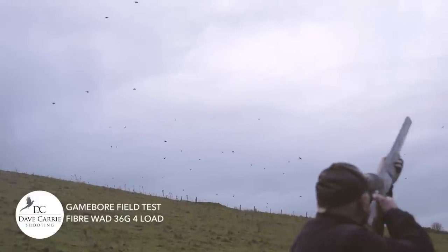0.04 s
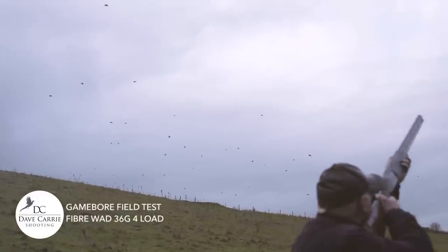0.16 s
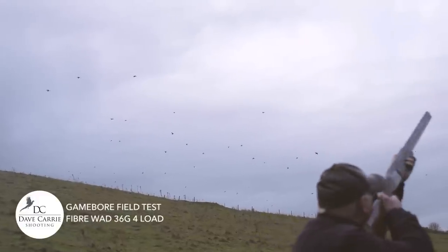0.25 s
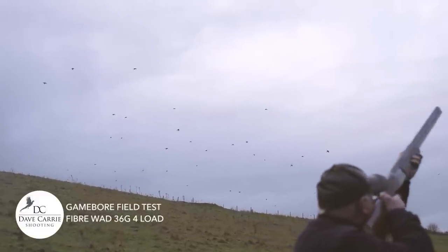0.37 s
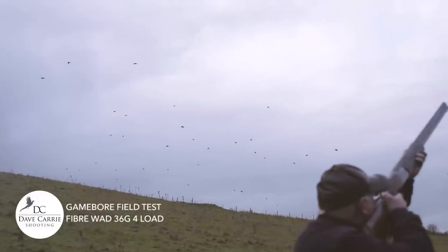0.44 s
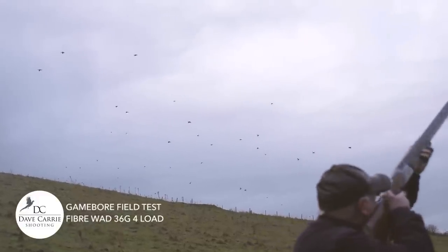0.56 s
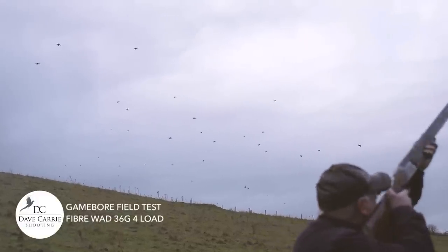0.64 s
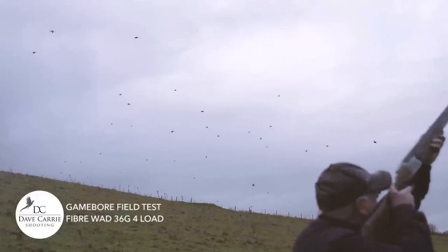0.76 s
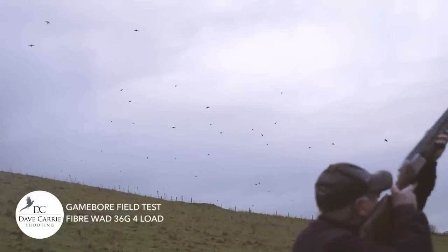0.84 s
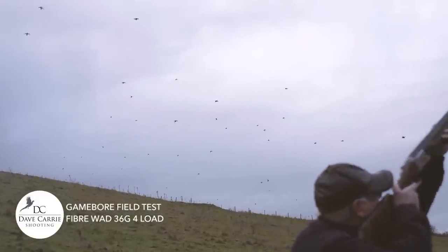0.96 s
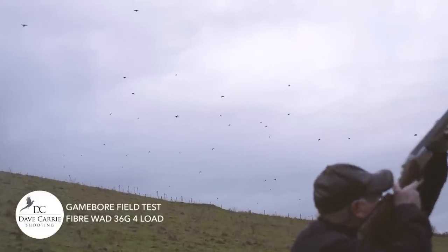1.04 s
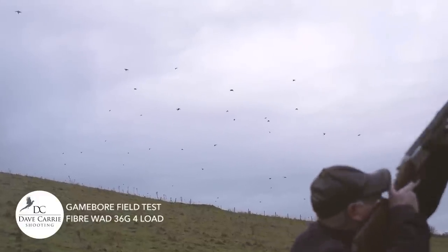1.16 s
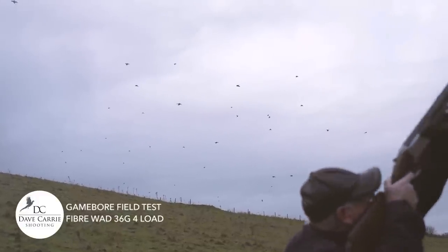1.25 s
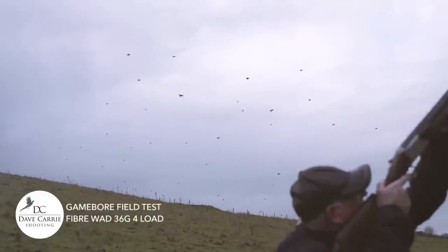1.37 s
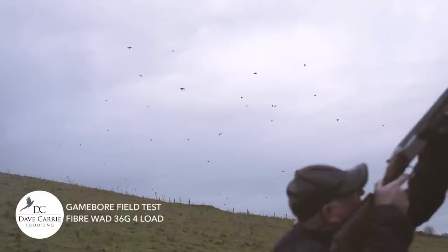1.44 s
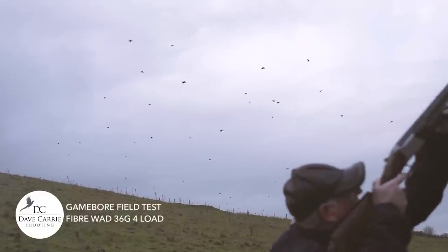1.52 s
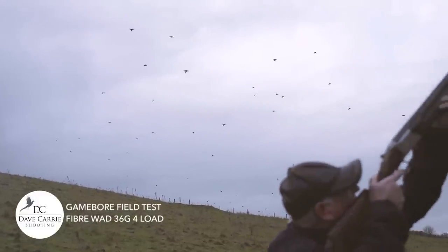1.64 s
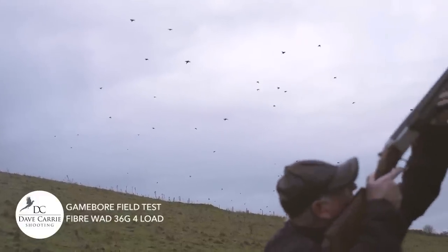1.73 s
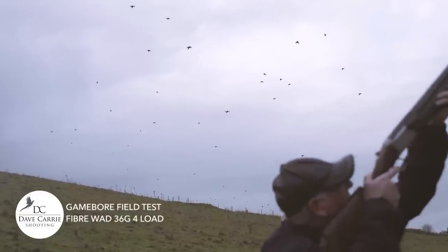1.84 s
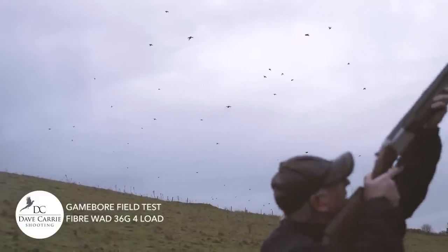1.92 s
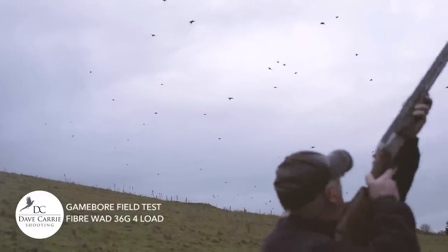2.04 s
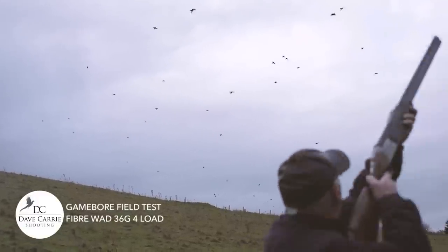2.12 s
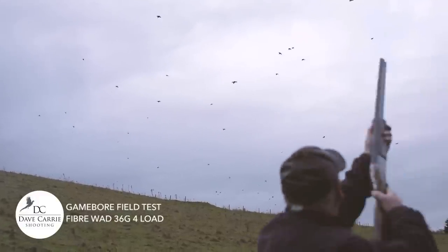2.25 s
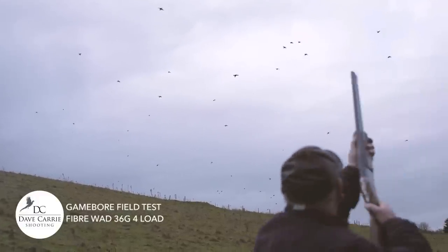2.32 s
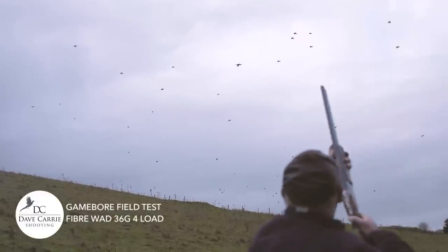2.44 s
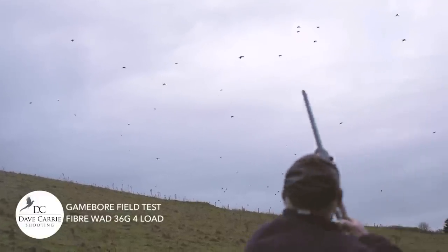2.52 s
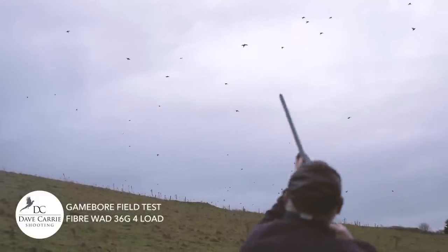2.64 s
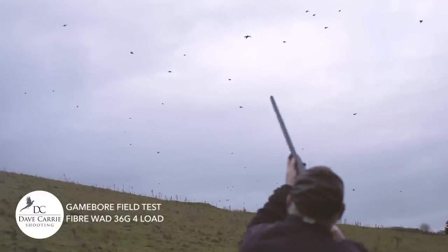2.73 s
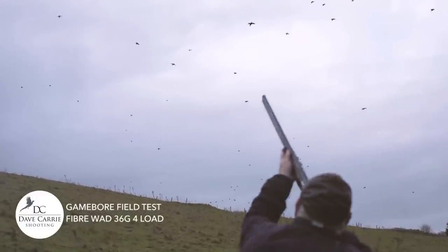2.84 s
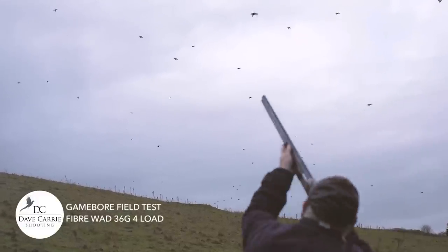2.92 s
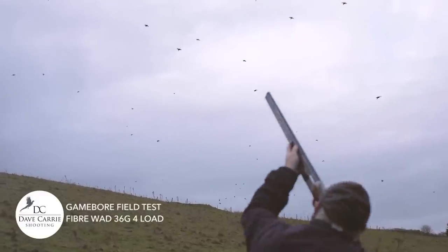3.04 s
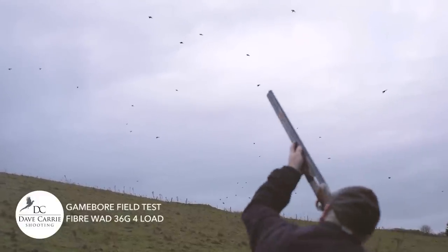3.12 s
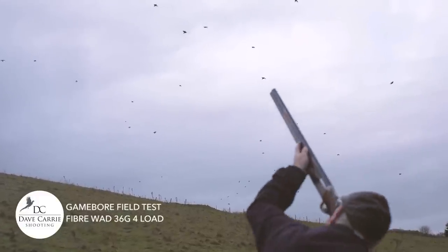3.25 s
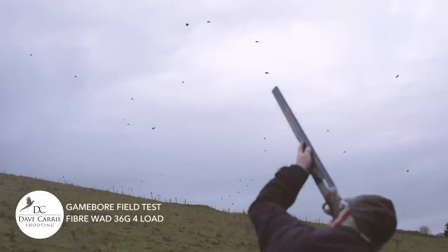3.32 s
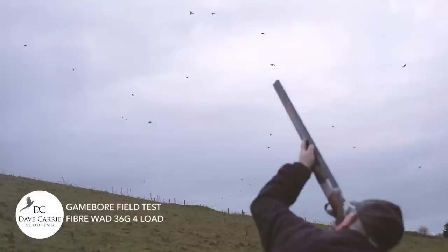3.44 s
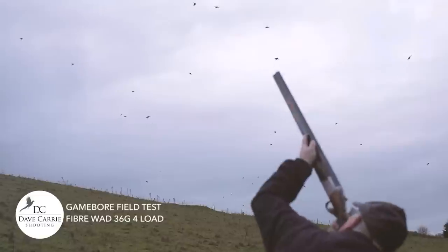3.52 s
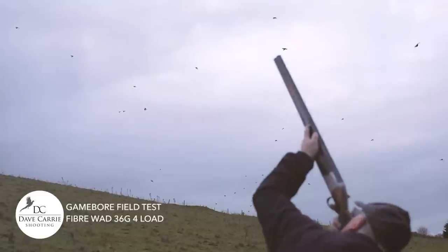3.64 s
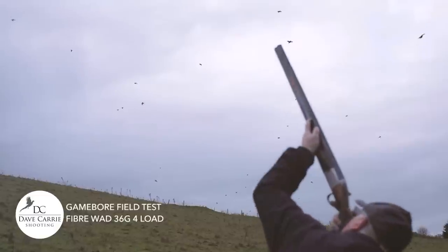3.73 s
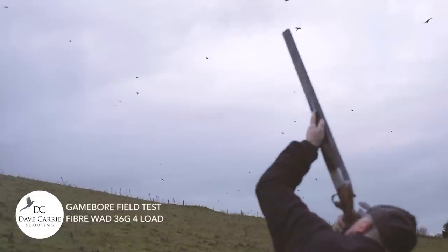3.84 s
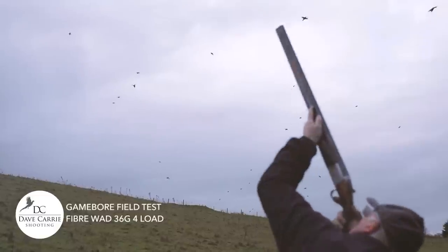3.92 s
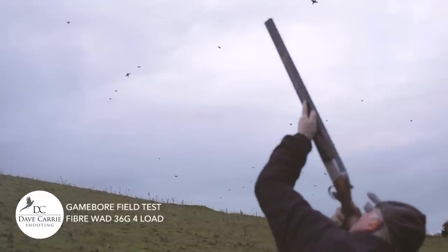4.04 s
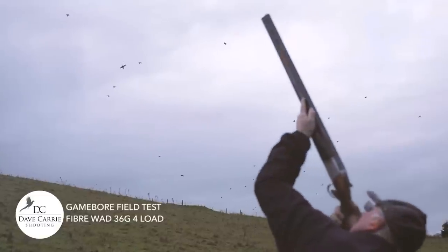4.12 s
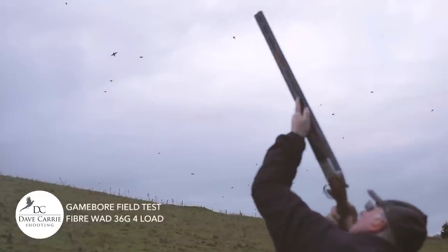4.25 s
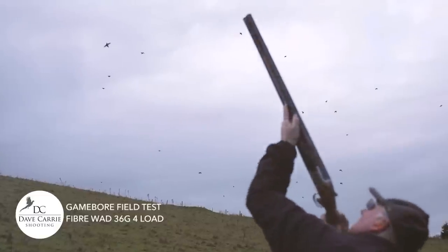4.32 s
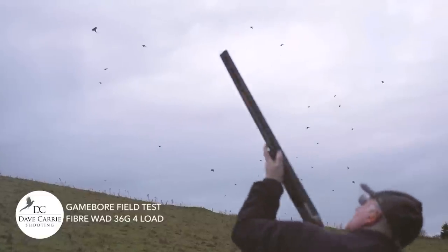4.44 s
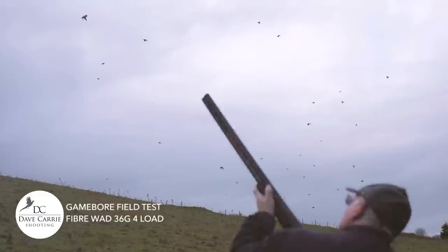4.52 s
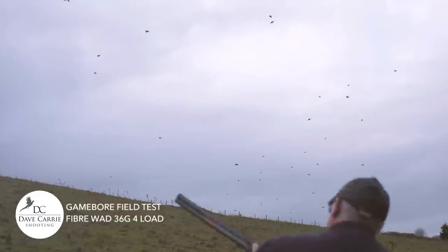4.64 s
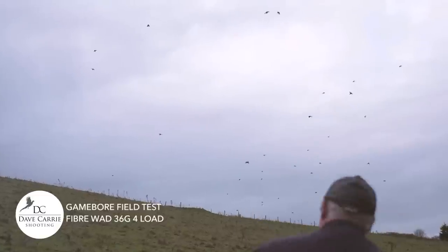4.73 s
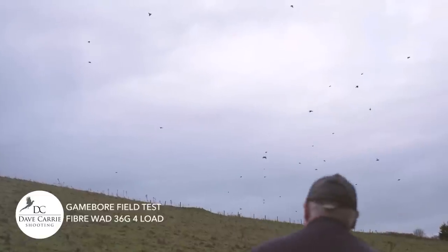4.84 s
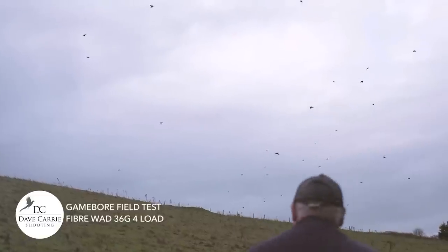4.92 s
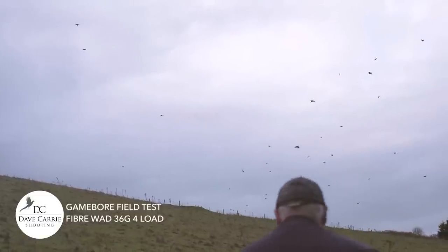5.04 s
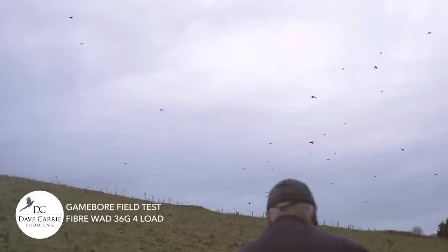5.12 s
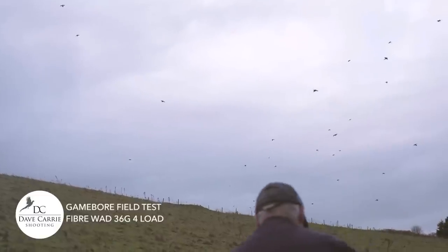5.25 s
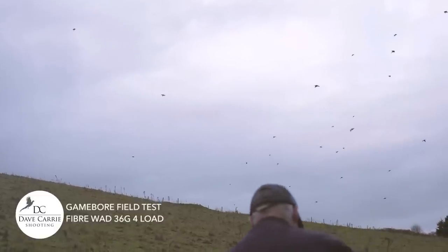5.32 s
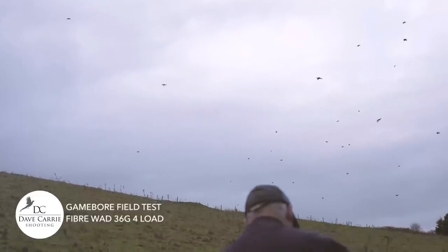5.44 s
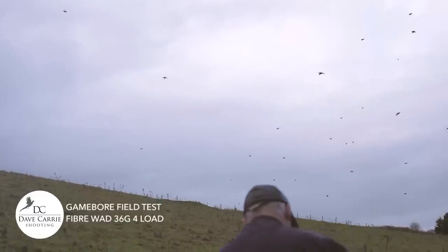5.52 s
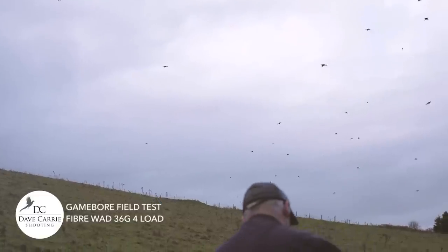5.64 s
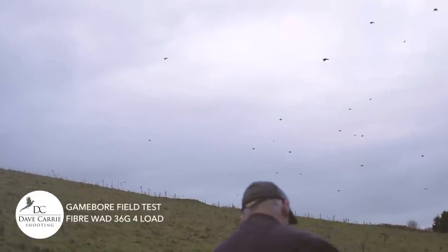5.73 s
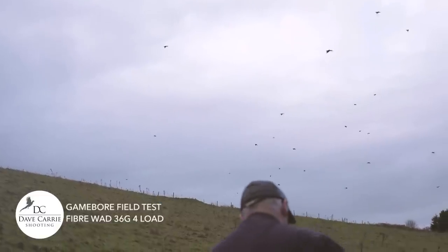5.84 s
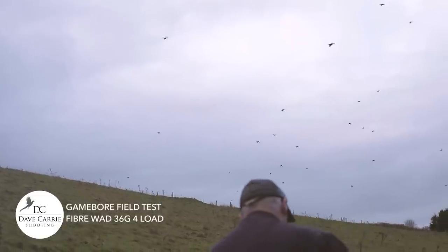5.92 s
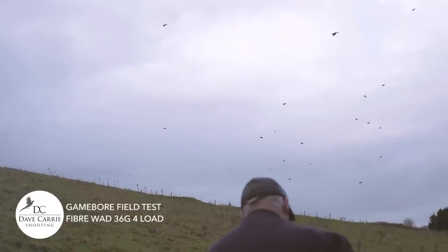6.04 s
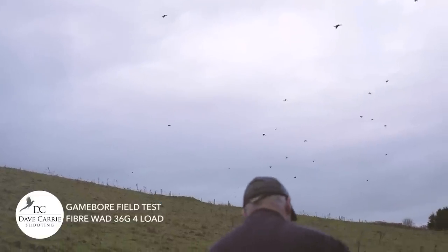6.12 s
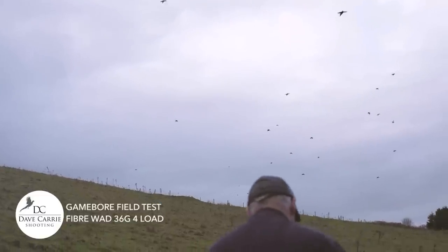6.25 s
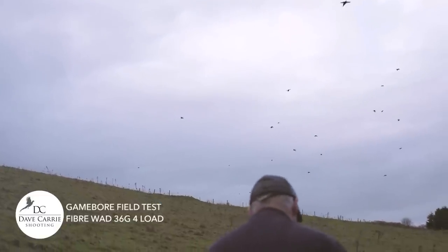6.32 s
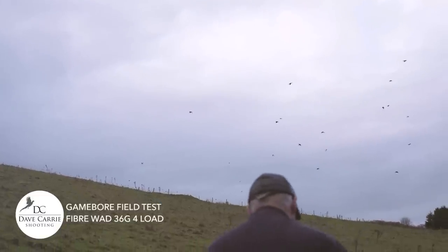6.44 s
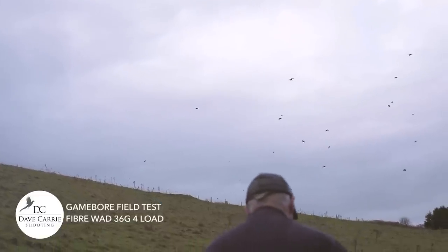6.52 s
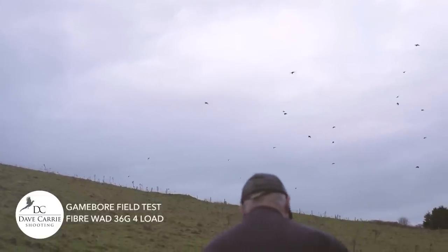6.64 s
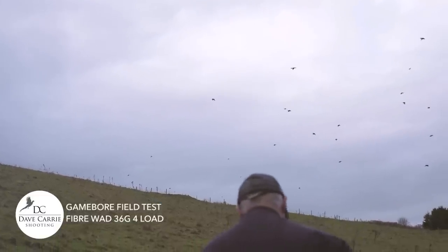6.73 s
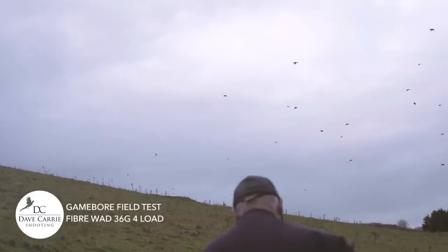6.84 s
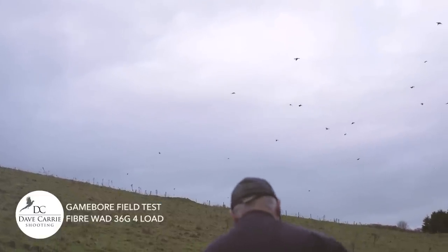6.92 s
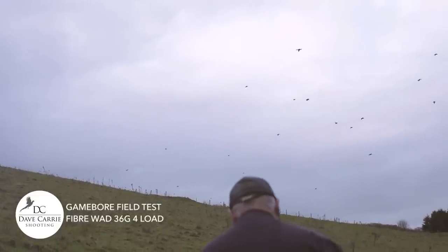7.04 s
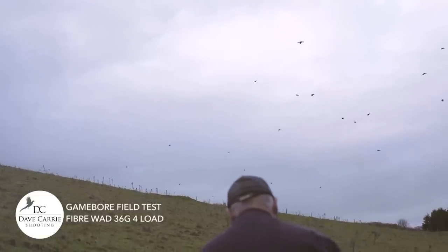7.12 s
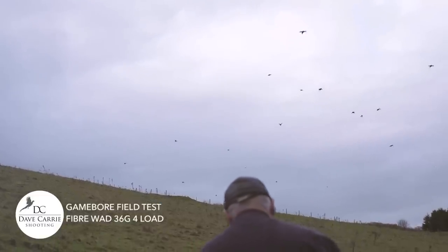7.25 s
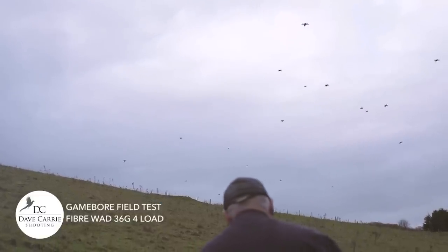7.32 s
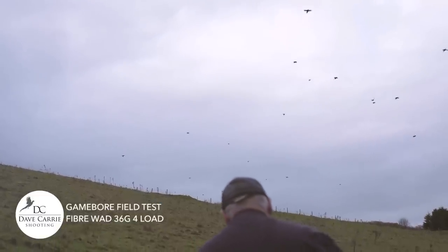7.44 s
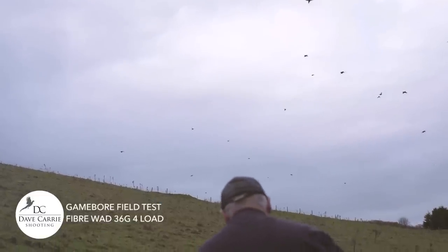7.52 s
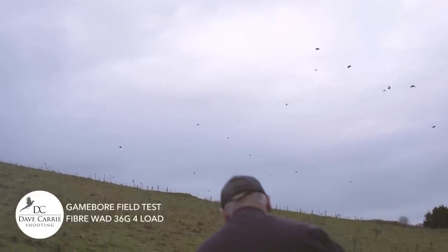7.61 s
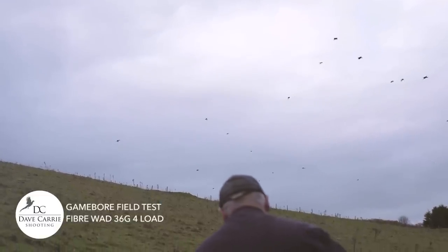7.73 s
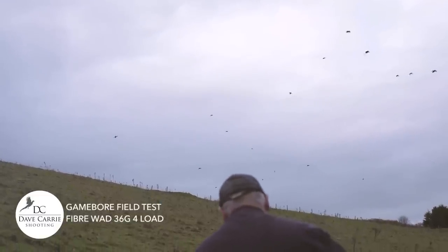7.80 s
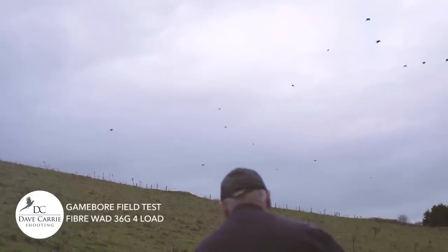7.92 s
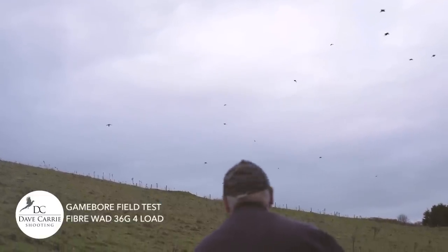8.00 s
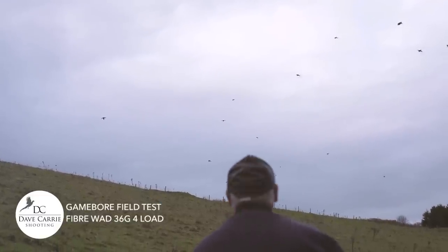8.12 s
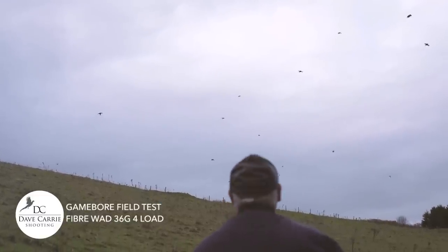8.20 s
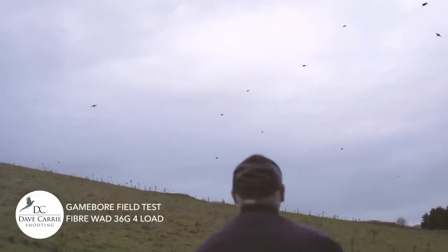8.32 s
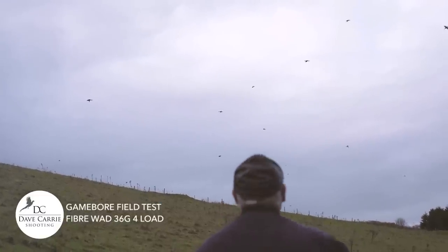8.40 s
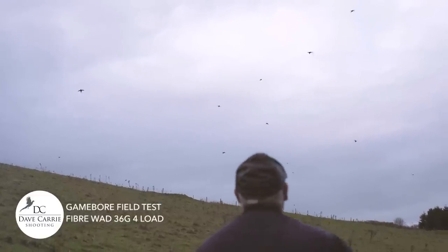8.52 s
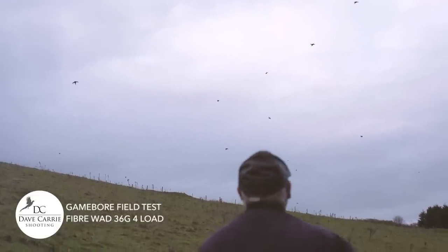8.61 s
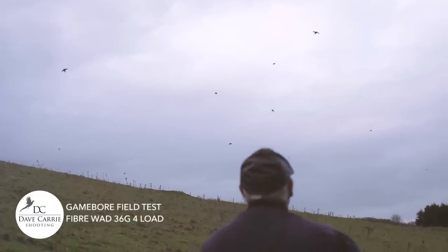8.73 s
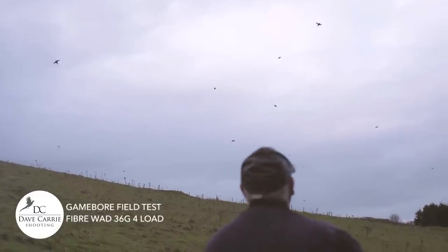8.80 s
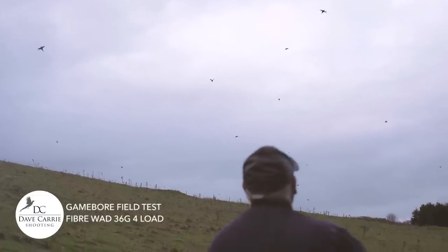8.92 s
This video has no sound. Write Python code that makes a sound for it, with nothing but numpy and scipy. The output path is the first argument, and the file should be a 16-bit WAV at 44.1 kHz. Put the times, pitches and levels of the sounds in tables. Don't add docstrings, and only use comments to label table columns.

```python
import sys
import numpy as np
from scipy import signal
from scipy.fft import rfft, irfft
from scipy.io import wavfile
from scipy.ndimage import uniform_filter1d

SR = 44100
rng = np.random.default_rng(int(sys.argv[2]) if len(sys.argv) > 2 else 0)


def bounce(signal):
    frames = np.transpose(np.atleast_2d(signal))
    limited = np.clip(frames, -1, 1)
    pcm = np.round(limited * 32767).astype(np.int16)
    wavfile.write(sys.argv[1], SR, pcm)


def makeup_ratio(level_db):
    decades = np.asarray(level_db, float) / 20
    return 10 ** decades


N = 395577


def evened(x):
    return x / np.sqrt(np.mean(x ** 2) + 1e-20)


def read(points, hz):
    f, value = np.transpose(points)
    return np.interp(np.log(hz + 1), np.log(f + 1), value)


def add(mix, s, sound):
    part = mix[max(round(s * SR), 0):][:len(sound)]
    part += sound[:len(part)]


def coloured(x, points):
    return irfft(rfft(x) * makeup_ratio(read(points, np.fft.rfftfreq(len(x), 1 / SR))), len(x))


def high_passed(x, hz):
    return signal.sosfilt(signal.butter(2, hz, "high", fs=SR, output="sos"), x)


def field(points, size, count, patchy_db, stripy_db, t60=None):
    frames, hz = 4 * count // size + 5, np.fft.rfftfreq(size, 1 / SR)
    real, imaginary, patches = rng.standard_normal((frames, len(hz), 3)).T
    patches = uniform_filter1d(patches, size=5, axis=0)
    patches = evened(uniform_filter1d(patches, size=6, axis=1))
    stripes = evened(uniform_filter1d(rng.standard_normal(frames), size=3))
    spectrum_db = read(points, hz)
    level_db = spectrum_db[:, None] + patchy_db * patches + stripy_db * stripes
    start = np.sqrt(np.mean(makeup_ratio(2 * spectrum_db)))
    if t60 is not None:
        elapsed = np.arange(frames) * size / 4 / SR
        level_db = level_db - 60 * elapsed / np.clip(read(t60, hz), .05, 5)[:, None]
    spectra = (real + 1j * imaginary) * makeup_ratio(level_db) / start
    x = signal.istft(spectra, nperseg=size, noverlap=3 * size // 4)[1][:count]
    return x / np.sqrt(size * 4 / 3)


# (time [s], strength [dB])
BREEZE = [(0, -55), (.9, -51), (1.7, -59), (2.1, -44.5), (2.52, -44.5), (3.0, -47.5), (3.7, -55.5),
          (4.6, -59), (5.15, -58.5), (5.8, -53), (6.5, -48.5), (7.05, -44), (7.6, -37.5), (8.0, -43.5),
          (8.4, -39.5), (8.97, -40)]
# (centre [s], length [s], peak [dB], rumble under the peak [dB])
GUSTS = [(2.028, 0.093, -40.5, -22), (2.117, 0.13, -40.5, 1), (2.185, 0.17, -45.5, -3),
         (2.338, 0.16, -40, -4), (2.443, 0.066, -49, 15), (2.584, 0.037, -58, 26.5),
         (2.753, 0.097, -30, -24), (2.828, 0.077, -44, 5.5), (2.956, 0.055, -56.5, 13.5),
         (3.104, 0.051, -38, 4.5), (4.823, 0.049, -58, 14.5), (6.558, 0.047, -61, 19.5),
         (6.94, 0.13, -57.5, 17.5), (7.357, 0.16, -52, 2), (7.434, 0.067, -36, 1),
         (7.515, 0.16, -24.5, -7.5), (7.614, 0.18, -28, -6), (7.728, 0.033, -40, 6), (7.884, 0.1, -44, 9.5),
         (8.337, 0.054, -55, 16), (8.48, 0.066, -38.5, 5), (8.644, 0.11, -36.5, 0), (8.727, 0.14, -27, -9),
         (8.842, 0.097, -27.5, -0.5), (8.966, 0.073, -45.5, -4)]
# (frequency [Hz], density [dB per Hz])
HEAVE_SPECTRUM = [(12, -15), (22, 6.5), (36, 2), (55, -12), (80, -52), (200, -120)]
# (frequency [Hz], density [dB per Hz])
RUMBLE_SPECTRUM = [(26, -32), (45, 5.5), (74, 6), (140, -5), (186, -12.5), (327, -26.5), (362, -30.5),
                   (400, -27), (520, -63.5), (880, -120)]
# (frequency [Hz], density [dB per Hz])
BUFFET_SPECTRUM = [(35, -34.5), (60, 2.5), (87, -7), (123, 4.5), (178, 2), (288, -5), (504, -16.5),
                   (675, -18), (842, -33.5), (1410, -45.5), (2000, -61.5), (2600, -93), (4400, -120)]
# (frequency [Hz], density [dB per Hz])
AIR_SPECTRUM = [(150, -40), (250, -9), (393, -14.5), (436, -11), (519, -6), (629, -9), (971, -10),
                (1160, -10.5), (1610, -17), (1980, -19), (2570, -20), (3170, -19.5), (4340, -29),
                (11300, -58), (16000, -54)]
GUST_EDGE_DB, GUST_FLAT = -24, 4.25
EDDY_DB, HEAVE_SHARE, HEAVE_OFFSET_DB = -18.5, 0.57, -27
AIR_DB, LINGER_DB, LINGER_T60 = -69, -62.5, 3.1
EARLIER_SHOT_S = -0.21


def wind():
    t = np.arange(0, N + 64, 64) / SR
    breeze_db = np.interp(t, *np.transpose(BREEZE))
    rumbling = makeup_ratio(2 * breeze_db)
    buffeting = makeup_ratio(2 * (breeze_db + EDDY_DB))
    airy = makeup_ratio(2 * AIR_DB) + 0 * t
    for s, length, peak_db, under_db in GUSTS:
        edge_db = GUST_EDGE_DB * abs(2 * (t - s) / length) ** GUST_FLAT
        gust = makeup_ratio(2 * (peak_db + np.maximum(edge_db, -120)))
        rumbling = rumbling + makeup_ratio(2 * under_db) * gust
        buffeting = buffeting + gust
    for s, _ in [(EARLIER_SHOT_S, 0)] + BESIDE_AT + NEXT_AT + FAR_AT:
        airy = airy + (t > s) * makeup_ratio(2 * (LINGER_DB - 60 * abs(t - s) / LINGER_T60))
    curves = [10 * np.log10(power) for power in (rumbling, buffeting, airy)] + [breeze_db]
    rumble_db, buffet_db, air_db, breeze_db = (np.interp(np.arange(N) / SR, t, c) for c in curves)

    rumble = evened(field(RUMBLE_SPECTRUM, size=1024, count=N, patchy_db=0.67, stripy_db=1.0))
    buffet = evened(field(BUFFET_SPECTRUM, size=1024, count=N, patchy_db=0.7, stripy_db=1.57))
    top = high_passed(buffet, 380)
    buffet = buffet - top + top * makeup_ratio(.8 * np.clip(buffet_db + 29, -30, 3))
    air = evened(field(AIR_SPECTRUM, size=512, count=N, patchy_db=1.85, stripy_db=2.0))
    heave = evened(field(HEAVE_SPECTRUM, size=4096, count=N, patchy_db=0.5, stripy_db=2.0))
    heave = heave * makeup_ratio(HEAVE_SHARE * breeze_db + HEAVE_OFFSET_DB)
    return heave + makeup_ratio(rumble_db) * rumble + makeup_ratio(buffet_db + 0.8) * buffet + makeup_ratio(air_db) * air


def specks():
    out, t = np.zeros(N), np.arange(400) / SR
    per_s, speck_db = 14, -84.5
    for when, pitch, size, cycles in rng.random((round(per_s * N / SR), 4)):
        hz = 4500 * 2 ** (1.4 * pitch)
        fade = makeup_ratio(speck_db + 9 * size - t * hz * (2 + 3 * cycles))
        add(out, when * N / SR, fade * np.sin(2 * np.pi * hz * t) * np.minimum(t * 2000, 1))
    return out


def puffs(rows):
    out = np.zeros(N)
    for s, peak_db, hz, length in rows:
        white, rough = rng.standard_normal((2, 8192))
        puff = evened(coloured(white, [(hz / 3, -18), (hz, 0), (hz * 1.0, -7), (hz * 2.1, -10),
                                       (hz * 4, -36), (hz * 8, -70)]))
        puff = puff * makeup_ratio(1.0 * evened(uniform_filter1d(rough, size=150)))
        puff = puff[:round(length * SR)]
        add(out, s - length / 2, makeup_ratio(peak_db) * np.hanning(len(puff)) * puff)
    return out


# (centre [s], peak [dB], centre
# frequency [Hz], length [s])
LATE = [(6.36, -63.5, 1350, 0.2), (6.5, -65, 1360, 0.2), (6.45, -67, 2500, 0.19), (6.63, -67.5, 1410, 0.18),
        (7.45, -66.5, 1500, .17), (7.6, -77, 2300, 0.16), (0.131, -52, 1290, 0.011),
        (2.343, -62.5, 1400, 0.012), (2.816, -59, 700, .014), (6.1, -57, 800, .014), (8.67, -57, 700, .014),
        (8.712, -51, 700, 0.012), (8.818, -52.5, 700, 0.012)]


def late_answers():
    return puffs(LATE)


# (time [s], peak [dB], pitch [Hz])
CHIRPS = [(0.0474, -63, 3530), (0.061, -75, 3600), (0.126, -53.5, 1327), (.24, -73, 3400),
          (0.684, -67, 3080), (3.084, -70, 3300), (3.108, -72, 3420), (3.163, -68.5, 3300),
          (3.214, -68.5, 3040), (3.244, -62, 3370), (3.266, -71, 3500), (3.292, -76, 3500),
          (3.324, -59, 3290), (7.597, -66.5, 3800), (7.677, -71, 3740), (7.691, -71, 3960)]


def birds():
    out, t = np.zeros(N), np.arange(500) / SR
    for s, peak_db, hz in CHIRPS:
        hoarse = 1 + .6 * evened(uniform_filter1d(rng.standard_normal(len(t)), size=50))
        whistle = np.sin(2 * np.pi * hz * (1.05 * t - 5.5 * t ** 2))
        add(out, s, makeup_ratio(peak_db) * np.hanning(len(t)) * hoarse * whistle)
    return out


# (centre [s], peak [dB], centre
# frequency [Hz], length [s])
RUSTLES = [(0.127, -57, 1310, 0.11), (1.997, -75, 2140, 0.02), (2.199, -69, 1500, 0.089),
           (2.378, -60.5, 1380, 0.12), (3.024, -69.5, 2600, 0.05), (4.117, -50, 3520, 0.029),
           (4.821, -84, 5500, .17), (4.938, -72, 5470, 0.27), (5.03, -86, 5000, .14),
           (6.103, -54, 820, 0.064), (7.38, -73, 1700, 0.15), (8.58, -73.5, 2470, 0.098)]


def rustles():
    return puffs(RUSTLES)


# (time [s], peak [dB], ring [Hz], ring t60 [s], brightness at the top [dB])
CLICKS = [(2.144, -47, 1230, 0.053, -21), (2.2183, -44.5, 1000, 0.048, -14), (2.947, -34, 1350, 0.028, -13),
          (4.7105, -46.5, 2120, 0.033, -19), (4.8623, -45, 1134, 0.04, -2), (4.8788, -23, 1990, 0.041, -14),
          (4.8822, -25, 2130, 0.03, 0.5), (4.8835, -28.5, 590, 0.038, -30), (5.024, -40, 1270, 0.05, -30),
          (5.551, -40.5, 1370, 0.025, -16), (6.3084, -31, 1350, 0.048, -15),
          (6.5238, -32, 1640, 0.033, -31), (6.845, -40.5, 1090, 0.021, -20),
          (6.9328, -33.5, 1520, 0.063, -6), (7.0693, -37, 1300, 0.074, -24),
          (7.7894, -52, 1358, 0.028, -13), (8.2445, -37, 1376, 0.023, -28), (8.5313, -45, 1560, 0.054, -17)]
# (time [s], peak [dB], ring [Hz])
TICKS = [(.196, -65, 4400), (7.68, -60, 5000), (0.392, -57, 3070), (0.8294, -66, 3020), (1.464, -46, 3180),
         (3.881, -47.5, 2371), (4.608, -55, 4060), (4.79, -55, 3620), (4.82, -42.5, 3110),
         (4.9292, -48.5, 3065), (5.7944, -60, 3400), (5.8605, -57, 3160), (5.873, -57, 3474),
         (6.308, -37, 3970), (6.5154, -69, 3650), (6.5634, -54, 3510), (6.5954, -59, 3650),
         (6.6074, -52, 3350), (6.6245, -54, 3300), (6.7964, -62, 3660), (6.8824, -50, 3030),
         (6.7535, -62, 4500), (6.77, -57, 3000), (6.9155, -59, 5000), (4.943, -55, 3800),
         (4.958, -56, 3800), (8.651, -48, 3180)]
TICK_T60, TICK_TOP_DB = 0.053, -13


def clicks():
    out, t = np.zeros(N), np.arange(4096) / SR
    small_parts = [(*row, TICK_T60, TICK_TOP_DB) for row in TICKS]
    for s, peak_db, hz, t60, top_db in CLICKS + small_parts:
        body, tick = rng.standard_normal((2, len(t)))
        body = evened(coloured(body, [(hz / 8, -36), (hz / 3.5, -8), (hz, 0), (hz * 2.68, -16), (hz * 5, -50)]))
        tick = evened(coloured(tick, [(2500, -27.5), (5000, 12), (9000, 0.42 * top_db),
                                      (13000, 1.3 * top_db), (16000, 3.1 * top_db - 10)]))
        fall_db = 60 * t / max(t60, .004)
        fade = makeup_ratio(-fall_db) + makeup_ratio(-18.5 - 0.61 * fall_db)
        knock = body + makeup_ratio(top_db - 0.77 * fall_db) * tick
        add(out, s, makeup_ratio(peak_db - 13.0) * fade * knock * np.minimum(t * 1200, 1))
    return out


GRAIN_DB = 1.5


def valley_echo(roll, decay, slap, treble_db):
    tail = field(roll, size=512, count=60000, patchy_db=1.42, stripy_db=0.5, t60=decay)
    n = len(tail)
    hits = rng.random(n) * (rng.random(n) < 75 / SR)
    slaps = np.convolve(hits, np.hanning(170), "same")
    tail = coloured(tail, [(2000, 0), (16000, 3 * treble_db)]) * (1 + slap * slaps)
    grain = np.convolve(rng.standard_normal(n), np.hanning(200), "same")
    tail = tail * makeup_ratio(GRAIN_DB * evened(grain))
    return tail * (1 - np.exp(-np.arange(n) / SR / 0.006))


DRIFT = 0.092


def echo_bounce(tail, bounce_ms):
    dulled = signal.lfilter(*signal.butter(1, 6000, fs=SR), tail)
    n = np.arange(len(tail))
    sway = np.sin(2 * np.pi * (2.3 * n / SR + rng.random()))
    wander = 1 + DRIFT * sway * np.minimum(n / 4000, 1)
    return np.interp(n - wander * bounce_ms * SR / 1000, n, dulled)


LATE_DULL_DB = -0.0142
SNAP_DB, SNAP_HZ, SNAP_T60_MS = 4.5, 5000, 11
RING_OCTAVES = .3


def gas_crackle(ms, crack, aim, delay_ms, t60_ms, treble_db):
    ring_hz, ring_db, tilt_db, _, _ = aim
    aimed = [(ring_hz / 2 ** RING_OCTAVES, 0), (ring_hz, ring_db), (ring_hz * 2 ** RING_OCTAVES, 0),
             (16000, tilt_db * np.log2(16000 / ring_hz))]
    fizz = evened(coloured(rng.standard_normal(len(ms)), crack))
    fizz = coloured(fizz, aimed) * makeup_ratio(-60 * ms / t60_ms) * np.minimum(ms * 2, 1)
    loss_db = .5 * treble_db * (delay_ms > 12) + LATE_DULL_DB * min(max(delay_ms, 0), 40)
    fizz = coloured(fizz, [(3000, 0.0036), (16000, 2.34 * loss_db)])
    if delay_ms <= 0:
        treble = signal.lfilter(*signal.butter(2, SNAP_HZ, "high", fs=SR), fizz)
        fizz = fizz + makeup_ratio(SNAP_DB - 60 * ms / SNAP_T60_MS) * treble
    return fizz


def blast_wave(ms, sign, rise_ms, fall_ms, flip, edge_hz):
    pulse = sign * np.where(ms < rise_ms, ms / rise_ms, -flip * np.exp((rise_ms - ms) / fall_ms))
    return signal.lfilter(*signal.butter(2, edge_hz, fs=SR), pulse)


AWAY_DB, DULLING = -10.5, 0.25


def shot(at, strength, aim, paths, crack, roll, decay, comb_db, rise_ms, fall_ms, thump_hz, edge_hz, low_hz,
         slap, sign, rebound_ms, flip, thump_ms):
    s, bounce_ms = at
    peak_db, bounce_db, crackle_db, thump_db, valley_db = strength
    *_, back_ms, back_db = aim
    treble_db = DULLING * min(peak_db - AWAY_DB, 0)
    t, out = np.arange(4096) / SR, np.zeros(round(1.5 * SR))
    ms = t * 1000
    lead = .006

    blast = blast_wave(ms, sign, rise_ms, fall_ms, flip, edge_hz)
    for delay_ms, blast_db, noise_db, t60_ms in paths:
        fizz = gas_crackle(ms, crack, aim, delay_ms, t60_ms, treble_db)
        pulse = makeup_ratio(blast_db) * (-1 if delay_ms > 8 else 1) * blast
        direct = pulse + makeup_ratio(crackle_db + noise_db) * fizz
        bounced = pulse + makeup_ratio(crackle_db + noise_db - 4) * fizz
        add(out, lead + delay_ms / 1000, direct)
        add(out, lead + (delay_ms + bounce_ms) / 1000, makeup_ratio(bounce_db) * bounced)

    tail = valley_echo(roll, decay, slap, treble_db)
    add(out, lead, makeup_ratio(valley_db) * tail)
    add(out, lead, makeup_ratio(valley_db + comb_db) * echo_bounce(tail, bounce_ms))

    centre_ms = back_ms + .3
    width_ms = np.where(ms < centre_ms, rebound_ms, .55 * rebound_ms)
    add(out, lead, sign * makeup_ratio(back_db + 2.5) * np.exp(-((ms - centre_ms) / width_ms) ** 2))
    out = high_passed(out, low_hz)
    thump = makeup_ratio(thump_db - 60 * t * thump_hz / 6) * np.sin(2 * np.pi * thump_hz * t)
    add(out, lead + thump_ms / 1000, thump)
    return s - lead, makeup_ratio(peak_db) * out


# (frequency [Hz], t60 [s])
VALLEY_DECAY = [(60, 0.26), (250, 1.2), (1000, 0.94), (2500, .9), (5000, 0.71), (9000, 0.6), (13000, 0.24),
                (16000, 0.15)]
# (time [s], delay of the ground bounce [ms])
FAR_AT = [
    (5.1834, 1.42),
    (6.1524, 1.62),
]
# (peak [dB], bounce [dB], crackle [dB], thump [dB], valley [dB])
FAR_STRENGTH = [
    (-2.5, -0.9, -6, -23.5, -29.5),
    (-3.5, 0.04, -10.5, -20.5, -30.5),
]
# (ring [Hz], ring [dB], treble tilt [dB per octave], rebound [ms], rebound [dB])
FAR_AIM = [
    (2500, 8.1, -1, 5, -25.5),
    (2400, 3, -0.45, 5.5, -25),
]
# (delay [ms], blast [dB], crackle [dB], crackle t60 [ms])
FAR_PATHS = [
    (0, 2, 7, 15.5),
    (4.1, -14, -9.5, 5.1),
    (9, -35.5, -34.5, 45),
]
# (frequency [Hz], density [dB per Hz])
FAR_CRACK = [(120, -52.5), (200, -39), (579, -0.5), (883, -8), (1680, 5), (2130, -14), (3370, -4.5),
             (4120, -8.5), (10500, -31.5), (16000, -61.5)]
# (frequency [Hz], density [dB per Hz])
FAR_ROLL = [(88, -33.5), (150, -0.5), (186, 3.5), (328, -10), (524, -9), (905, -6), (1310, -6.5),
            (3490, -12.5), (12200, -32), (16000, -30)]


def gun_far():
    out = np.zeros(N)
    for row in zip(FAR_AT, FAR_STRENGTH, FAR_AIM):
        add(out, *shot(*row, FAR_PATHS, FAR_CRACK, FAR_ROLL, VALLEY_DECAY, comb_db=-11.0,
                       rise_ms=0.32, fall_ms=0.6, thump_hz=119, edge_hz=5000, low_hz=159, slap=1.4,
                       sign=0.57, rebound_ms=1.1, flip=0.41, thump_ms=1.2))
    return out


# (time [s], delay of the ground bounce [ms])
NEXT_AT = [(1.011, 1.55), (1.2278, 1.5), (3.3652, 1.9), (4.1729, 1.96), (7.107, 1.55), (8.0161, 1.36)]
# (peak [dB], bounce [dB], crackle [dB], thump [dB], valley [dB])
NEXT_STRENGTH = [
    (-21, 5.8, -6, 0, -13),
    (-15, 13, -3, -5, -26.5),
    (-0.5, 0.021, -14, -31.5, -30),
    (-7, 0.17, -11, -20, -23.5),
    (-17.5, 8.2, -11, -4.5, -15),
    (-24.5, 13.9, -8.5, 14.5, -11),
]
# (ring [Hz], ring [dB], treble tilt [dB per octave], rebound [ms], rebound [dB])
NEXT_AIM = [
    (3180, 7.8, -0.5, 7.5, -4.5),
    (1050, 4.4, -2.5, 8.2, -4),
    (2470, 4, 0.5, 9.3, -13.5),
    (910, 4, 0, 9, -16),
    (700, 6.7, 0.5, 7.77, 0),
    (2760, 1.7, -1, 6.36, 11),
]
# (delay [ms], blast [dB], crackle [dB], crackle t60 [ms])
NEXT_PATHS = [
    (0, 1.5, 0, 18),
    (9.86, -8, 2.5, 22),
    (18.12, -40, -13, 90),
    (24.2, -40.5, -12.5, 44),
    (27.68, -22, -4.5, 20),
]
# (frequency [Hz], density [dB per Hz])
NEXT_CRACK = [(120, -39), (200, 2.5), (558, -2.5), (806, -1), (1040, -0.5), (3490, -10), (4270, -11),
              (5130, -26), (5630, -15), (14300, -40.5), (16000, -47.5)]
# (frequency [Hz], density [dB per Hz])
NEXT_ROLL = [(35, -28.5), (60, -2), (212, -13), (408, -10.5), (842, -13.5), (1010, -5), (1220, -15),
             (1410, -15.5), (4320, -25), (16000, -57.5)]


def gun_next():
    out = np.zeros(N)
    for row in zip(NEXT_AT, NEXT_STRENGTH, NEXT_AIM):
        add(out, *shot(*row, NEXT_PATHS, NEXT_CRACK, NEXT_ROLL, VALLEY_DECAY, comb_db=-6,
                       rise_ms=.6, fall_ms=1.3, thump_hz=111.35, edge_hz=2600, low_hz=90, slap=.8,
                       sign=-1, rebound_ms=2.1, flip=0.24, thump_ms=1.5))
    return out


# (frequency [Hz], t60 [s])
BESIDE_DECAY = [(60, 1.2), (250, .8), (1000, 0.95), (2500, 0.85), (5000, 0.73), (9000, 0.49), (13000, 0.3),
                (16000, 0.3)]
# (time [s], delay of the ground bounce [ms])
BESIDE_AT = [
    (1.2542, 1.5),
    (3.8979, 1.4),
]
# (peak [dB], bounce [dB], crackle [dB], thump [dB], valley [dB])
BESIDE_STRENGTH = [
    (-2, -17, 3, -14, -19.5),
    (-6, -12, 4.5, -14, -17),
]
# (ring [Hz], ring [dB], treble tilt [dB per octave], rebound [ms], rebound [dB])
BESIDE_AIM = [
    (1300, 2, 0, 10, -3),
    (1000, 5.5, 0, 9.7, -5),
]
# (delay [ms], blast [dB], crackle [dB], crackle t60 [ms])
BESIDE_PATHS = [
    (-4, -38, -23, 140),
    (-0.5, 2, 12.5, 15),
    (6, 4, -6, 12),
    (6, -7, -14, 73),
    (37, -26.5, -27.5, 15),
    (84.5, -13.5, -40, 75),
]
# (frequency [Hz], density [dB per Hz])
BESIDE_CRACK = [(120, -32), (200, 2), (749, -9), (883, -3), (1250, -0.5), (1740, -14), (2800, -2.5),
                (6880, -19.5), (12200, -26.5), (16000, -32.5)]
# (frequency [Hz], density [dB per Hz])
BESIDE_ROLL = [(35, -38), (60, -9), (118, 1), (323, -3), (785, -7.5), (903, -8), (1220, -7.5),
               (1740, -12.5), (3940, -18), (8000, -26.5), (13000, -30), (16000, -33)]


def gun_beside():
    out = np.zeros(N)
    for row in zip(BESIDE_AT, BESIDE_STRENGTH, BESIDE_AIM):
        add(out, *shot(*row, BESIDE_PATHS, BESIDE_CRACK, BESIDE_ROLL, BESIDE_DECAY, comb_db=-20.0,
                       rise_ms=0.56, fall_ms=1.6, thump_hz=229.2, edge_hz=1700, low_hz=141, slap=.9,
                       sign=1, rebound_ms=0.32, flip=.49, thump_ms=1.1))
    return out


def scene():
    background = wind() + specks() + late_answers() + birds()
    handling = rustles() + clicks()
    return (background + handling + gun_far() + gun_next() + gun_beside())[None]


def top_cut(x):
    return signal.sosfilt(signal.butter(12, 16820, fs=SR, output="sos"), x)


# (centre [s], length [s], depth [dB])
DIPS = [
    (2.554, 0.14, -5),
    (6.015, 0.066, -7),
    (7.31, 0.064, -8),
    (8.124, 0.062, -4.5),
    (8.893, 0.039, -5.5),
]


def record(dry):
    t = np.arange(N) / SR
    heard = dry - .22 * np.roll(dry, round(.00106 * SR), axis=1)
    gate_db = sum(depth_db * np.exp(-(2 * (t - s) / length) ** 6) for s, length, depth_db in DIPS)
    heard = heard * makeup_ratio(gate_db)
    ceiling = .62
    clipped = heard / (1 + abs(heard / ceiling) ** 8) ** (1 / 8)
    coupled = signal.lfilter(*signal.butter(2, 36, "high", fs=SR), clipped)
    band_limit = signal.firwin(255, 16100, window=("kaiser", 7), fs=SR)
    finished = signal.oaconvolve(coupled, band_limit[None], "same")
    return top_cut(finished)


dry = scene()
out = record(dry)
bounce(out)
```